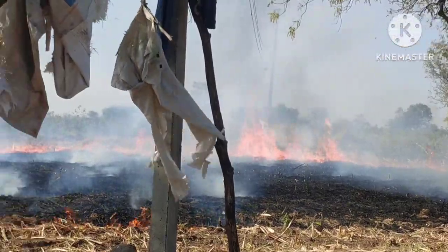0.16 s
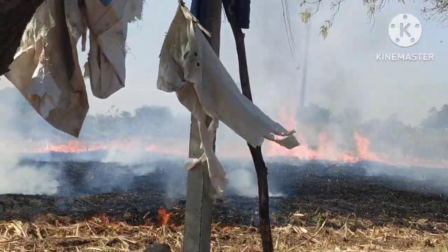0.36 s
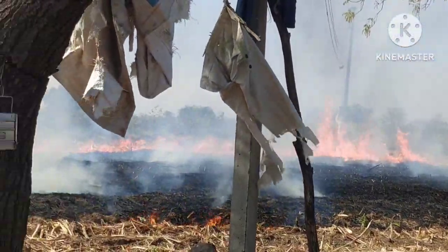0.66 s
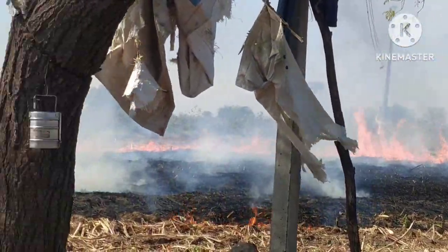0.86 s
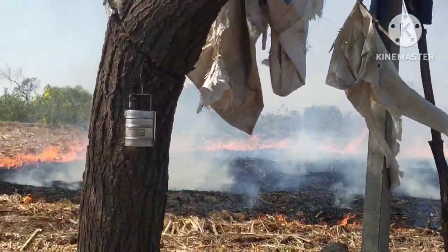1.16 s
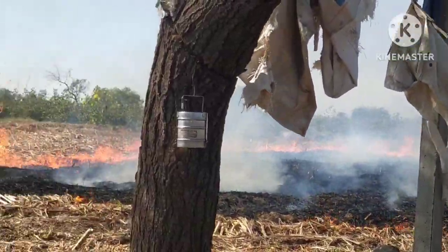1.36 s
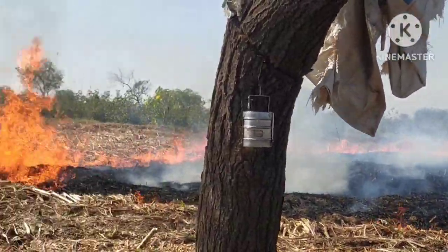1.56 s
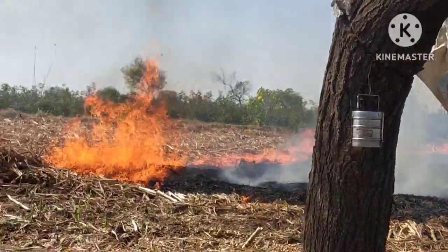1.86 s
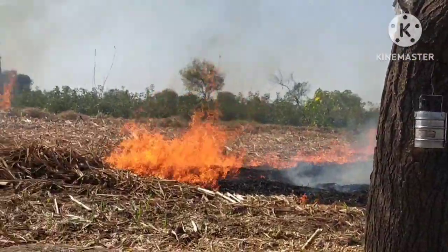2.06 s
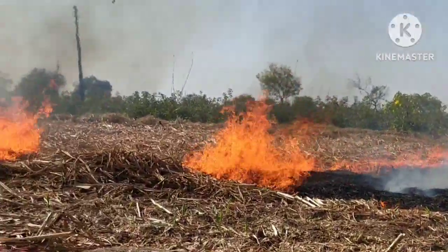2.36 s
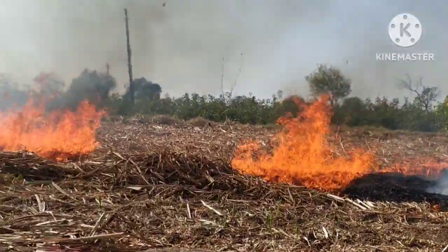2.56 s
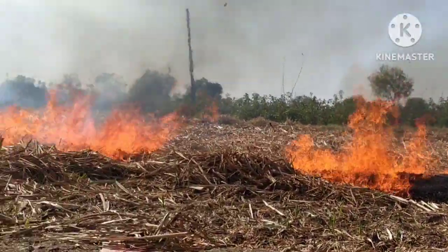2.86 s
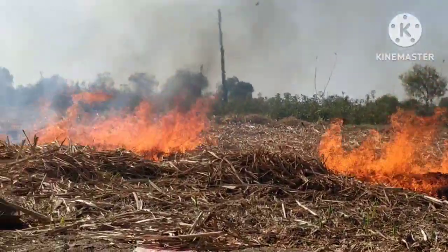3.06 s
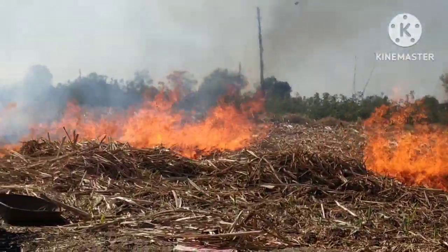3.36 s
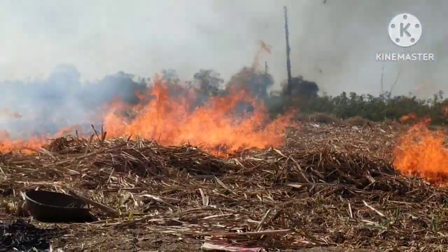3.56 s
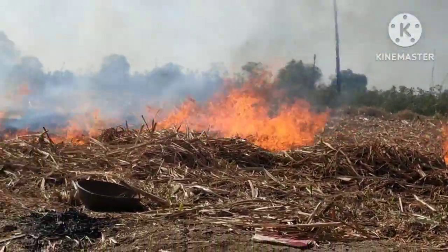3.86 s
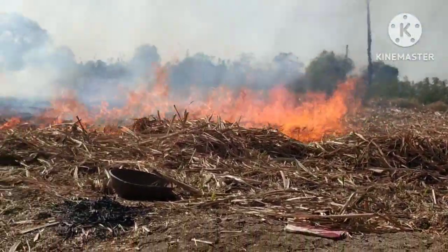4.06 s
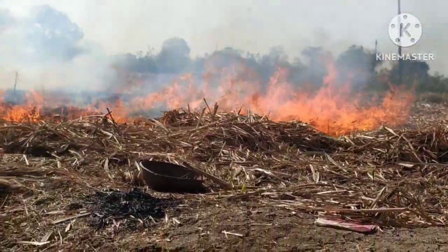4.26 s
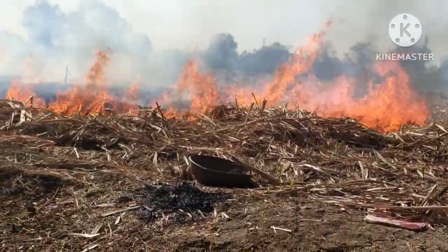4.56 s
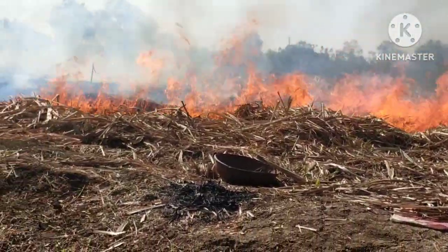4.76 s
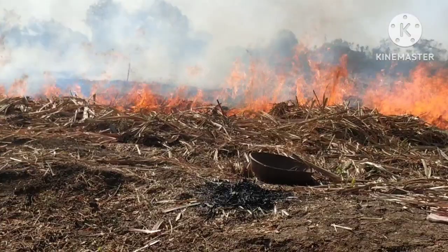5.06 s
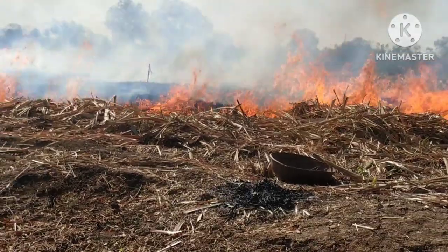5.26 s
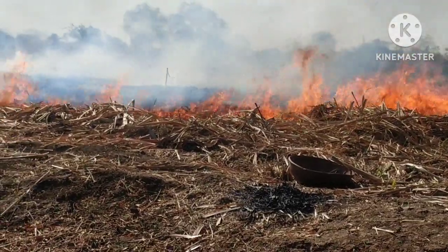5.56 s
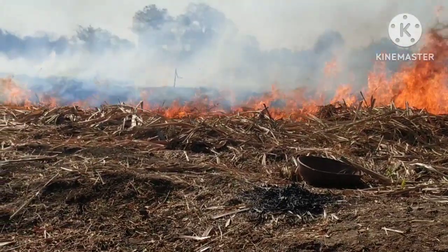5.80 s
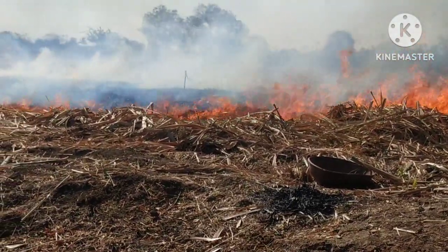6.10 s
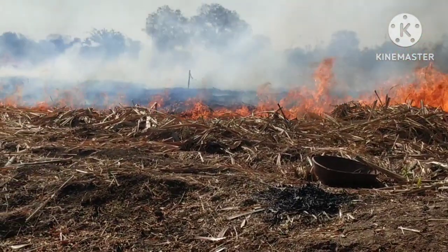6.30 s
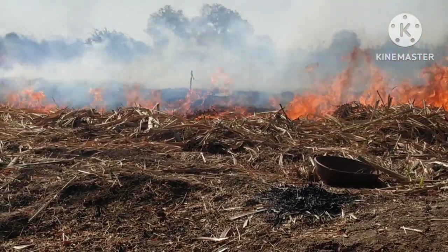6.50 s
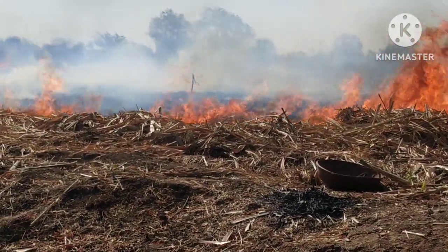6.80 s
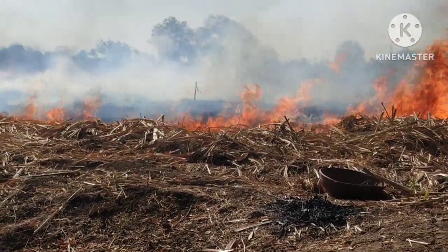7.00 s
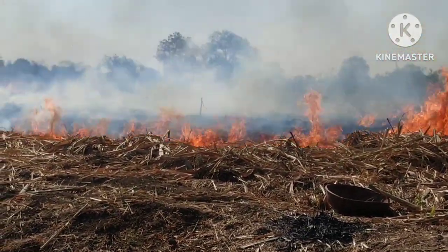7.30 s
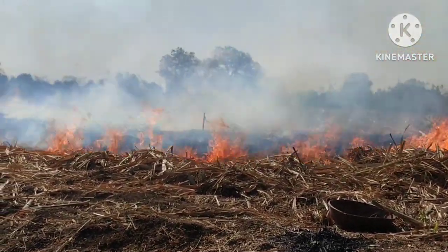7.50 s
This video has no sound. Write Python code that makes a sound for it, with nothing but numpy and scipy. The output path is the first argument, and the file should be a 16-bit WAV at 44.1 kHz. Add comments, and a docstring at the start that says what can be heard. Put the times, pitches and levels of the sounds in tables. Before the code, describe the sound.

Dry cane leaves crackle and fizz in an open field fire, stalks popping sharply, with early wind buffets and a clinking hanging tin.

```python
"""Dry sugarcane leaves crackle and fizz in an open field fire, stalks pop, and low flames rush beneath.
Fractures are short torn noise bursts with a diffuse answer from the stubble; flames and wind are coloured noise.
Early gusts buffet the right microphone port, and a hanging steel lunch tin clinks four times as a sum of decaying modes.
A small bird chirps in trilled tones, and a faint airy whistle rises far away as a wavering tone."""
import sys
import numpy as np
from scipy import signal
from scipy.fft import rfft, irfft, next_fast_len
from scipy.io import wavfile
from scipy.ndimage import uniform_filter1d, map_coordinates

SR = 44100
rng = np.random.default_rng(int(sys.argv[2]) if len(sys.argv) > 2 else 0)


def store_wav(level_fs):
    """Save 16-bit WAV to argv[1]."""
    pcm = np.round(np.clip(np.atleast_2d(level_fs), -1, 1) * 32767)
    wavfile.write(sys.argv[1], SR, pcm.T.astype(np.int16))


N = 336924
TIME = np.arange(N) / SR  # s

# All levels in the tables are relative, before the gains of their layer.
# The loudest bursting stalks. Each row: break in seconds, level in dB, hollow body against the crack in dB,
# decay constant of the burst in seconds, left minus right in dB.
STALK_POPS = [(0.265,-21.5,-10.5,0.0023,2), (0.5344,-28,1.5,0.00055,-5), (.667,-25,0,0.00063,3.5),
              (0.7597,-3.5,-26,0.0017,2.5), (0.8365,-27,-5.5,0.0013,1), (1.289,-24,-14.5,0.0043,-3.5),
              (1.477,-5,-15,0.0014,-1), (1.7816,-23.5,0,0.0022,-4), (1.8427,-15.5,-2.5,0.00065,-4),
              (1.9144,-22,-12,0.0041,-3), (2.1123,-12.5,-6.5,0.00078,-4), (2.1635,-14.5,-5,0.0018,-3.5),
              (2.374,-26.5,-8,0.00093,-12), (2.47,-25,-17,0.0021,-5.5), (2.6407,-13,-7,0.0023,2.5),
              (2.6502,-12.5,-16,0.0031,2), (2.671,-13,-15,0.0031,-1.5), (2.9894,-24,-18.5,0.00091,-5),
              (3.4587,-11,-12.5,0.00083,1), (3.491,-14,-8,0.0023,2.5), (3.5845,-18.5,-8,0.0017,1),
              (3.596,-21,-6,.0025,5), (3.616,-9,-1.5,0.00092,0), (3.7805,-27,-10.5,0.0055,-1.5),
              (3.8556,-18,-12.5,0.0012,-2.5), (4.369,-8.5,-12.5,0.0027,0), (4.4476,-13.5,-18,.0014,1.5),
              (4.4666,-13,-6,0.0026,-1.5), (4.4892,-14,-28,0.0045,-1), (4.9174,-23,-15,0.0027,2),
              (5.153,-28.5,-6,0.0029,0), (5.242,-30.5,-2,0.0014,-7), (5.3454,-13.5,-12.5,0.0012,2.5),
              (5.4411,-12,-18,0.0012,-3.5), (5.568,-27,-4,0.0017,0), (5.6267,-12,-13,0.0015,-0.5),
              (5.672,-21.5,-13,0.002,0.5), (5.734,-25,-21,0.002,3), (5.9025,-14.5,-9,0.00067,5),
              (5.923,-24,-16,0.002,3), (6.001,-7.5,-19,0.0024,-1), (6.115,-11,-7,0.0012,-6.5),
              (6.194,-24.5,0,0.0034,-0.5), (6.299,-14,-2,0.0014,2), (6.317,-19,-26,.0016,1),
              (6.4177,-3,-2,0.0011,1), (6.488,-27.5,-24,.0023,2), (6.5607,-21.5,-28,0.0027,0),
              (6.7683,-17.5,-36,0.0011,7), (6.8103,-24.5,-34,0.002,2), (6.952,-29,-29,0.00096,3),
              (7.2823,-22.5,-10.5,0.0058,-2), (7.3243,-8.5,-30,0.00097,0.5), (7.4085,-18.5,-32,0.0028,-1),
              (7.4558,-13.5,-9.5,0.0035,-1.5)]
# Spectra of the splitting wall and the hollow stem. Each row: frequency in Hz, density in dB per Hz.
CRACK_SPECTRUM = [(150,-33),(700,-20.5),(1300,-31.5),(2000,-17),(3300,-15),(5200,-9),(7500,-6),(9300,-1),(10500,-5.5),(12000,-16.5),(15000,-27.5),(16500,-52.5)]
HOLLOW_SPECTRUM = [(150,-47.5),(600,-6.5),(1300,-1),(2200,4),(3200,-0.5),(4300,-7),(7000,-18),(14000,-7)]


def pops(crack_db=-1.5, body_db=-2.5, wet_db=-3.5, far_slope=0.39):
    """Brittle fracture under steam pressure: a bright crack excites a hollow body; weak pops are more diffuse."""
    crack, body = np.zeros((2, 2, N))
    for s, db, hollow_db, length, pan_db in STALK_POPS:
        # a weak pop lies farther off, so more of it arrives scattered
        pop_wet_db = wet_db - far_slope * (db + 19.5)
        pop = amp(db) * sides(pan_db) * scatter(burst(length), pop_wet_db)
        add(crack, s - LEAD, pop)
        add(body, s - LEAD, pop * amp(hollow_db))
    bright = amp(crack_db) * colour(crack, CRACK_SPECTRUM)
    return bright + amp(body_db) * colour(body, HOLLOW_SPECTRUM)


# Low knocks under some of the pops. Each row: break in seconds, level in dB.
POP_KNOCKS = [(0.536,-15), (1.478,-16), (2.113,-23.5), (2.641,-26), (3.588,-22.5), (6.417,-29), (7.456,-27)]
# Spectrum of the knocks. Each row: frequency in Hz, density in dB per Hz.
KNOCK_SPECTRUM = [(80,-24),(300,-6.5),(600,-6),(1000,-7.5),(2000,-18),(5000,-34)]


def knocks(level_db=-3, length=0.0024):
    """Low-frequency radiation: the dull, deep part of a bursting stalk's sound, nearly alike at both ports."""
    track = np.zeros((2, N))
    for s, db in POP_KNOCKS:
        add(track, s - LEAD, amp(db + level_db) * scatter(burst(length, alike=0.84), -19))
    return colour(track, KNOCK_SPECTRUM)


# Small leaves snapping close by. Each row: break in seconds, level in dB, left minus right in dB.
LEAF_SNAPS = [(.5979,-27.5,3), (0.888,-36,-8), (1.145,-24,1), (3.138,-29,-4), (3.9834,-28.5,3),
              (4.998,-26,0), (5.2922,-29,7), (5.504,-24.5,3), (5.772,-27,-5.5), (6.0445,-22,-7),
              (7.1065,-16.5,2), (7.1641,-22.5,3)]
# Spectrum of a snapping leaf. Each row: frequency in Hz, density in dB per Hz.
SNAP_SPECTRUM = [(400,-19),(2000,-9.5),(5000,-10.5),(9300,6.5),(12000,-10.5),(16000,-25)]


def snaps(level_db=1, length=0.0013, wet_db=-9):
    """Near-field fracture: direct sound outweighs scatter, so close leaves give a short, dry, bright tick."""
    track = np.zeros((2, N))
    for s, db, pan_db in LEAF_SNAPS:
        snap = scatter(burst(length), wet_db)
        add(track, s - LEAD, amp(db + level_db) * sides(pan_db) * snap)
    return colour(track, SNAP_SPECTRUM)


def leaf_ticks(count, level_db, spread_db, wet_db):
    """Random impulsive emission: thin leaves snap at scattered moments, sizes and directions."""
    track = np.zeros((2, N))
    # one moment at random in each equal slice of the scene
    moments = (np.arange(count) + rng.uniform(0, 1, count)) * N / SR / count
    draws = np.clip(rng.standard_normal((count, 2)), -1.8, 1.8)
    for when, (size, pan) in zip(moments, draws):
        tick = scatter(burst(rng.uniform(.0006, .002)), wet_db)
        add(track, when, amp(level_db + spread_db * size) * sides(3 * pan) * tick)
    return track


# Strength of the burning leaves. Each row: time in seconds, level in dB.
LEAF_FIRE_LEVEL = [(0,-56.5), (.55,-57.5), (.8,-56), (1.3,-59), (2.1,-51.5), (3.2,-54), (4.3,-57.5),
                   (4.6,-51.5), (5.0,-51.5), (6.2,-51), (7.1,-54.5)]
# Spectrum of ticks and fizz. Each row: frequency in Hz, density in dB per Hz.
FIZZ_SPECTRUM = [(710, -36), (1200, -26), (1610, -14.5), (1820, -7.5), (2190, -4.5), (2820, -9.5),
                 (4280, -6), (5630, -8), (6220, -5.5), (9030, 1), (15300, -21), (16000, -31), (16500, -64)]
# a burst stalk vents and fizzes on: dB against its tabled pop level, amplitude decay constant in s
FLARE_DB, FLARE_S = -36.5, 0.063


def crackle(hiss_db=-0.5, grain_db=3.0, flicker_db=3.54):
    """Superposed fractures: leaf ticks stand out of a fizz of countless tiny ones, which flares after each pop."""
    fire = amp(curves(LEAF_FIRE_LEVEL)[0])
    ticks = leaf_ticks(count=160, level_db=12.5, spread_db=4.5, wet_db=-1)
    flare_power = np.zeros(N)
    for s, db, *_ in STALK_POPS:
        fade = np.exp(-2 * np.abs(TIME - s) / FLARE_S)
        flare_power += amp(db + FLARE_DB) ** 2 * (TIME > s) * fade
    unevenness_db = grain_db * wobble(1500) + flicker_db * wobble(25)
    fizz = unit(rng.standard_normal((2, N)) * amp(unevenness_db))
    fizz_strength = amp(hiss_db) * np.sqrt(fire ** 2 + flare_power)  # powers add
    return colour(fire * ticks + fizz_strength * fizz, FIZZ_SPECTRUM)


# Churning of the flames. Each row: time in seconds, level in dB.
ROAR_LEVEL = [(0,-54), (.5,-53), (1.2,-45), (2.0,-47.5), (3.2,-51.5), (4.0,-48.5), (5.7,-45.5), (7.2,-53)]
# Spectra of the low rumble and of the rush above it. Each row: frequency in Hz, density in dB per Hz.
RUMBLE_SPECTRUM = [(10,-17),(25,2.5),(50,3),(100,-3.5),(170,-10.5),(260,-17),(450,-35.5),(1200,-61.5)]
RUSH_SPECTRUM = [(120,-20.5),(300,10),(500,1.5),(730,3),(1000,0),(1600,-7),(3500,-26)]


def flames(rumble_db=3, rush_db=-63.5, rush_follows=0.096):
    """Turbulent combustion noise: churning hot gas rumbles and flutters; the rush follows its swell only a little."""
    roar_db, = curves(ROAR_LEVEL)
    rumble = amp(roar_db + rumble_db + 0.98 * wobble(7.3)) * noise(RUMBLE_SPECTRUM) * sides(2.7)
    swell_db = rush_follows * (roar_db - roar_db.mean())
    rush = amp(rush_db + swell_db + wobble(7.8)) * noise(RUSH_SPECTRUM)
    return rumble + rush


# Contacts of the tin, two of its four clinks being double. Each row: contact in seconds, level in dB,
# ring against the contact in dB.
TIN_CONTACTS = [(1.056, -9, -11), (1.0661, -13.5, -1), (1.3636, -12, -3.5), (1.3692, -13, -1),
                (1.6677, -8, -1), (2.0057, -6.5, -4)]
# Modes of the tin. Each row: frequency in Hz, mean level in dB, time to decay by 60 dB in seconds.
TIN_MODES = [(727,-21.5,0.49),(1452,-25,0.65),(1724,-19,0.85),(1834,-14,0.75),(1943,-0.5,0.045),(2016,-9.5,0.54),(2080,1,0.084),(2200,-6,0.091),(2390,-10.5,0.41),(2423,-7.5,0.082),(2800,-17,0.18),(3763,-24.5,0.64),(4000,-17,0.058),(4100,-11,.12),(4100,4,0.032),(4450,-19,0.062),(5900,-18.5,0.5),(6360,-13,0.17),(7400,-29,0.15),(8680,-2.5,0.023),(9100,-1,0.043),(10400,-14,.12)]
# Spectrum of the contact noise. Each row: frequency in Hz, density in dB per Hz.
CLANK_SPECTRUM = [(300,-20),(700,-16.5),(1300,-19.5),(2100,-2),(2600,-6.5),(3300,-19),(4200,-8),(5200,-14.5),(9200,-7),(12000,-20.5),(16000,-30)]


def tin(ring_db=-14, clank_db=-5, vary_db=2, beat_hz=4):
    """Modal vibration: contacts excite the crowded, damped modes of thin steel; a few clear ones ring on."""
    ring, clank = np.zeros((2, 2, N))
    t = np.arange(SR) / SR
    hz, mode_db, t60 = np.transpose(TIN_MODES)[:, :, None]
    for s, db, own_db in TIN_CONTACTS:
        strength = amp(mode_db + vary_db * rng.standard_normal(hz.shape) - 60 * t / t60)
        phase = rng.uniform(0, 2 * np.pi, (2, len(TIN_MODES), 1))
        # the wall is not quite round, so each mode splits and beats
        mode_beat_hz = beat_hz * rng.uniform(.5, 2, hz.shape)
        beating = .7 + .3 * np.cos(2 * np.pi * mode_beat_hz * t)
        modes = (strength * beating * np.sin(2 * np.pi * hz * t + phase)).sum(1)
        modes *= 1 - np.exp(-t / 0.0015)  # soft onset
        add(ring, s, amp(db + own_db + ring_db) * modes)
        add(clank, s - LEAD, amp(db + clank_db) * scatter(burst(0.0053), -3.5))
    return ring + colour(clank, CLANK_SPECTRUM)


GUST_ATTACK_S, GUST_RELEASE_S = 0.024, 0.013  # rise constant, and fall constant before lingering
GUST_LINGER = 1  # long gusts die slowly: extra fall constant in s per second of length


def gust(start, length, db):
    """Exponential envelope: a gust rises, holds and dies away."""
    before = np.maximum(start - TIME, 0)
    after = np.maximum(TIME - start - length, 0)
    release = GUST_RELEASE_S + GUST_LINGER * length
    return amp(db) * np.exp(-before / GUST_ATTACK_S - after / release)


# Gusts on the right port. Each row: start of the hold in seconds, length of the hold in seconds, strength in dB.
WIND_GUSTS = [(0.028,0.11,-26.5), (0.255,0.061,-25.5), (0.411,.13,-27), (0.789,0.1,-32), (0.987,0.049,-32),
              (1.306,.025,-38.5), (1.417,0.018,-38), (4.081,0.027,-46), (4.41,0.024,-44.5),
              (5.082,0.014,-44), (5.198,0.12,-42.5), (5.763,0.031,-48.5), (5.991,0.026,-47)]
# Spectra of soft and hard buffets. Each row: frequency in Hz, density in dB per Hz.
BREEZE_SPECTRUM = [(20,-13.5),(70,-3),(115,-5.5),(165,3),(240,-6.5),(330,-21),(700,-41.5),(2000,-70.5)]
BLAST_SPECTRUM = [(20,-8),(100,-2.5),(180,3.5),(300,1.5),(420,-7.5),(600,-19),(1000,-39.5),(1600,-53.5),(3000,-72)]
CALM_DB = -62  # strength of the air between gusts


def wind(level_db=7.0, knee_db=-31, lee_breeze_db=-16, lee_blast_db=-36, eddy_db=2, swirl_db=0.6):
    """Turbulent pressure: eddies beat on the right port, and each harder buffet reaches higher in pitch."""
    strength = np.sqrt(amp(CALM_DB) ** 2 + sum(gust(*row) ** 2 for row in WIND_GUSTS))
    buffet_db = 20 * np.log10(strength) + eddy_db * wobble(60) + swirl_db * wobble(14)
    hard = 1 / (1 + np.exp((knee_db - buffet_db) / 4))  # share of blast, 0 to 1
    breeze = np.sqrt(1 - hard) * noise(BREEZE_SPECTRUM) * amp([[lee_breeze_db], [0]])
    breeze[0] *= 1 - hard  # a strong gust leaves the left port in the lee
    blast = np.sqrt(hard) * noise(BLAST_SPECTRUM) * amp([[lee_blast_db], [0]])
    return amp(buffet_db + level_db) * (breeze + blast)


# Notes of the bird, one list each. Each row: time in seconds, mean pitch in Hz, level in dB.
BIRD_NOTES = [
    [(.71,3400,-60),(.727,3200,-57),(.748,4200,-51)],
    [(.875,3050,-52),(.89,2800,-61),(.915,3510,-52),(.94,4400,-53),(.965,4500,-77)],
    [(.8,6700,-78),(.9,6700,-59),(1.05,6500,-69)],
]


def bird(trill_hz=68, depth=.07, blur=0.0255):
    """Frequency modulation: a fast trill roughens the thin chirps; the last listed, higher note is held."""
    trill = 1 + depth * np.sin(2 * np.pi * trill_hz * TIME) + blur * wobble(1100)
    held = glide(BIRD_NOTES[-1], 1 + 0.0032 * wobble(400))
    song = sum(glide(rows, trill) for rows in BIRD_NOTES[:-1]) + held
    return scatter(np.array([song, song]), -4)[:, :N]


# Lower strand of the whistle. Each row: time in seconds, mean pitch in Hz, level in dB.
WHISTLE_PATH = [(2.549,1540,-52),(2.569,1620,-50),(2.629,1800,-52.5),(2.74,1720,-51.5),(2.83,1890,-46.5),(2.93,1920,-57.5),(3.1,1950,-58.5)]


def whistle(blur=0.0752):
    """Random frequency modulation: pitch jitter spreads a faint rising tone and its weaker upper strand into air."""
    upper = [(s, 1.36 * hz, db - 11) for s, hz, db in WHISTLE_PATH]

    def one_side():
        return sum(glide(rows, 1 + blur * wobble(700)) for rows in (WHISTLE_PATH, upper))
    return np.array([one_side(), one_side()])


def glide(rows, waver):
    """Phase integration: a tone follows (s, Hz, dB) rows, its pitch scaled by waver."""
    hz, db = curves(rows)
    inside = (TIME > rows[0][0]) & (TIME < rows[-1][0])
    gate = uniform_filter1d(1. * inside, size=400)  # softened ends
    return gate * amp(db) * np.sin(2 * np.pi * np.cumsum(hz * waver) / SR)


LEAD = .006  # fibres start to give this long before the break (s)


def burst(length, alike=0.55, ragged_db=3, lead_db=-19, tint_db=2):
    """Progressive fracture: a few fibres give, then the rest tear raggedly, with random colour and direction."""
    t = np.arange(2048) / SR - LEAD
    u = np.maximum(t, 0) / max(length, 1e-4)
    common, left, right, tear = rng.standard_normal((4, len(t)))
    share = np.clip(alike, 0, 1)  # power common to both sides
    main_break = (1 - np.exp(-2 * u)) * np.exp(-u)
    shape = main_break + amp(lead_db) * np.exp(-3 * np.abs(t) / LEAD)
    grain = np.sqrt(share) * common + np.sqrt(1 - share) * np.array([left, right])
    z = rfft(grain * amp(ragged_db * tear))
    hz = np.fft.rfftfreq(len(t), 1 / SR)
    tint = amp(tint_db * map_coordinates(rng.standard_normal(40), [hz / 700], mode="wrap"))
    lag = rng.normal(0, .00018) * np.array([[1], [-1]])  # s, opposite on the two sides
    x = irfft(z * tint * np.exp(2j * np.pi * hz * lag)) * shape
    return x * np.linalg.norm(shape) / np.linalg.norm(x, axis=1, keepdims=True)


# Scatter from the stubble. Each row: frequency in Hz, time to decay by 60 dB in seconds.
FIELD_DECAY = [(300,0.097),(2000,0.11),(9000,0.15),(15000,0.06)]


def scatter(x, wet_db):
    """Diffuse scattering: the sound is joined by its own decaying noise-like answer from the field."""
    hz, t, z = signal.stft(rng.standard_normal((2, SR // 5)), SR, nperseg=128)
    decay = amp(-60 * t / along(FIELD_DECAY, hz)[:, None])
    tail = signal.istft(z * decay, SR)[1]
    tail *= amp(wet_db) / np.linalg.norm(tail[0])
    tail[:, 0] += 1  # direct sound
    return signal.fftconvolve(x, tail, axes=1)


def colour(x, spectrum):
    """Minimum-phase filtering: a folded cepstrum gives a causal filter of unit mean power gain."""
    m = 2 * next_fast_len(N // 2 + SR // 10)
    gain = unit(amp(along(spectrum, np.fft.rfftfreq(m, 1 / SR))))
    cepstrum = irfft(np.log(gain + 1e-6))
    cepstrum[1:m // 2] *= 2
    cepstrum[m // 2 + 1:] = 0
    return irfft(rfft(x, m) * np.exp(rfft(cepstrum)), m)[..., :N]


def noise(spectrum):
    """Incoherent sources: coloured noise, unrelated left and right, of unit power."""
    return unit(colour(rng.standard_normal((2, N)), spectrum))


def filtered(x, response):
    """Linear filtering: the spectrum is multiplied by a response of frequency in Hz."""
    m = next_fast_len(N + SR // 2)
    return irfft(rfft(x, m) * response(np.fft.rfftfreq(m, 1 / SR)), m)[:, :N]


def amp(db):
    """Decibel law: amplitude ratio of a level in dB."""
    return 10 ** (np.asarray(db) / 20)


def unit(x):
    """Power normalisation: scale to a root mean square of one."""
    return x / np.sqrt(np.mean(x ** 2) + 1e-20)


def along(points, hz):
    """Logarithmic pitch scale: read (Hz, value) points at hz."""
    f, v = np.transpose(points)
    return np.interp(np.log(hz + 1), np.log(f), v)


def curves(rows):
    """Linear interpolation: one value per sample for each column after the time."""
    s, *cols = np.transpose(rows)
    return [np.interp(TIME, s, c) for c in cols]


def wobble(rate):
    """Band-limited fluctuation: a smooth random curve with rate knots a second."""
    return map_coordinates(rng.standard_normal(N // 20), [TIME * rate], mode="wrap")


def sides(pan_db):
    """Level difference between the ears: left and right gains, pan_db apart."""
    return amp(np.array([[.5], [-.5]]) * pan_db)


def add(track, s, x):
    """Superposition: mix x into the track from time s."""
    part = track[:, max(0, round(s * SR)):][:, :x.shape[-1]]
    part += x[..., :part.shape[1]]


# Balance of the two ports. Each row: frequency in Hz, left minus right in dB.
PORT_BALANCE = [(300,-2),(1200,-2),(2500,-5),(5000,-5),(8500,0.5),(13000,7.5)]


def scene():
    """Superposition at two ports, the left the brighter one for fractures and tin; the other layers join directly."""
    bright = pops() + knocks() + snaps() + crackle() + tin()
    balanced = filtered(bright, lambda hz: sides(along(PORT_BALANCE, hz)))
    return balanced + flames() + wind() + bird() + whistle()


TOP_HZ = 15900  # band limit


def record(dry):
    """Band limiting: nothing at or above TOP_HZ passes."""
    return filtered(dry, lambda hz: hz < TOP_HZ)


dry = scene()
out = record(dry)
store_wav(out)
```